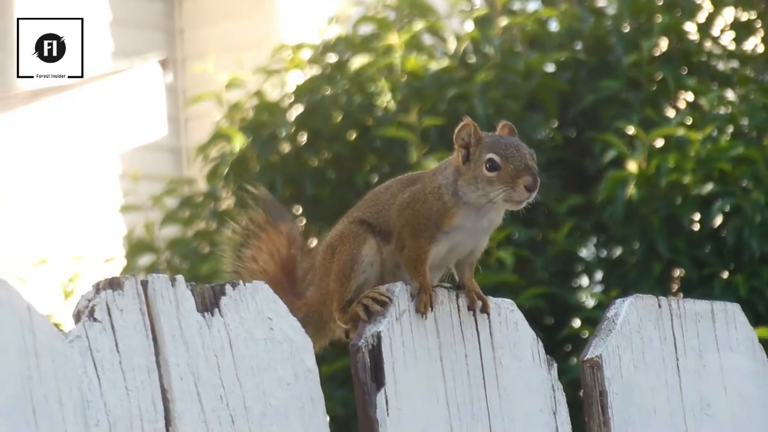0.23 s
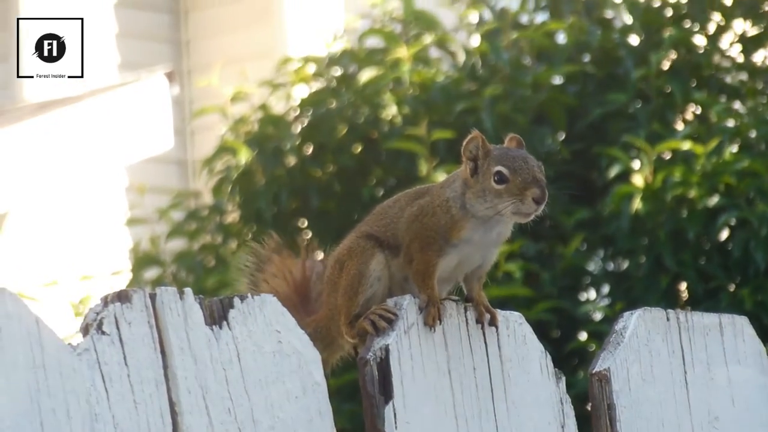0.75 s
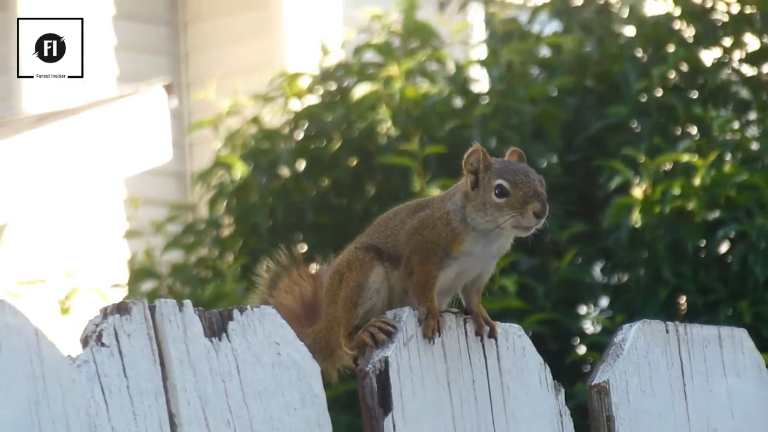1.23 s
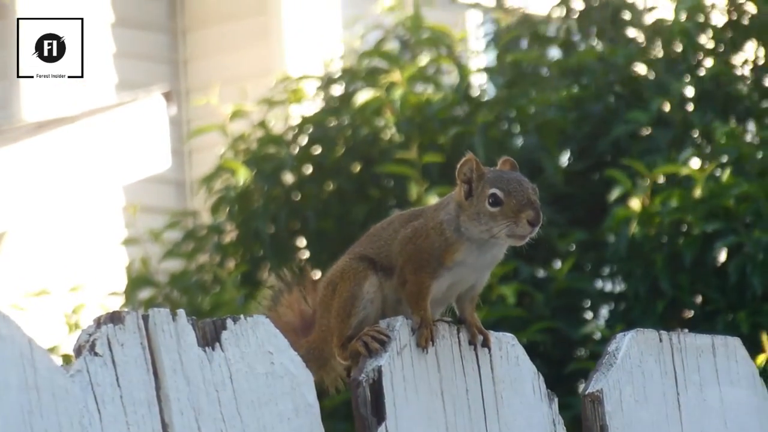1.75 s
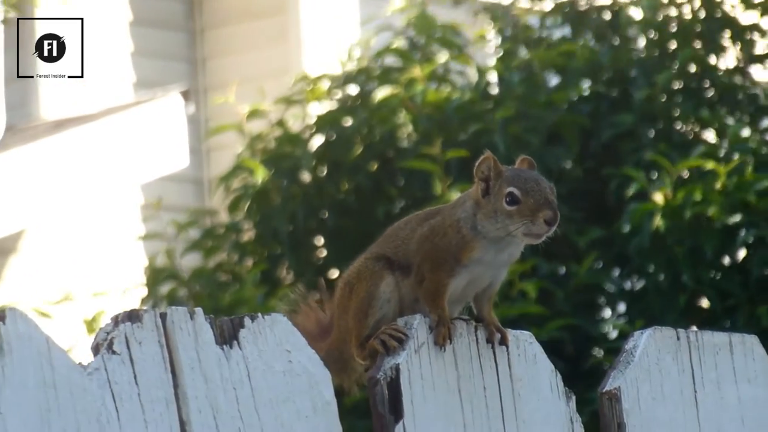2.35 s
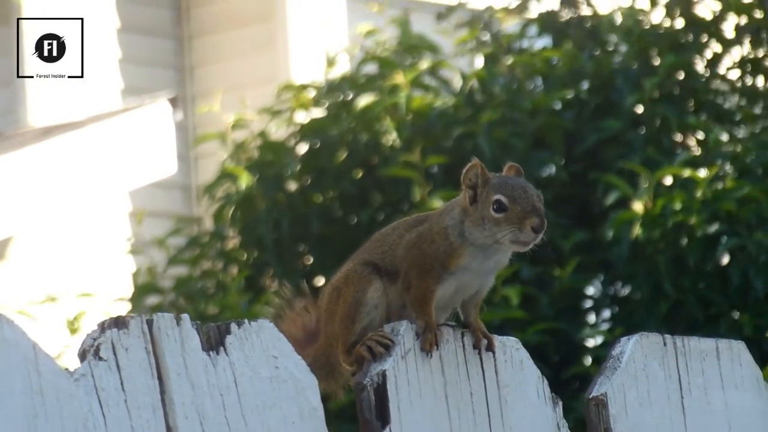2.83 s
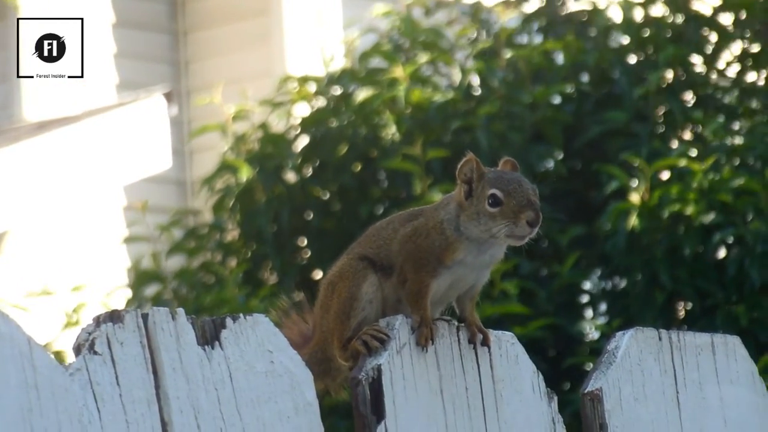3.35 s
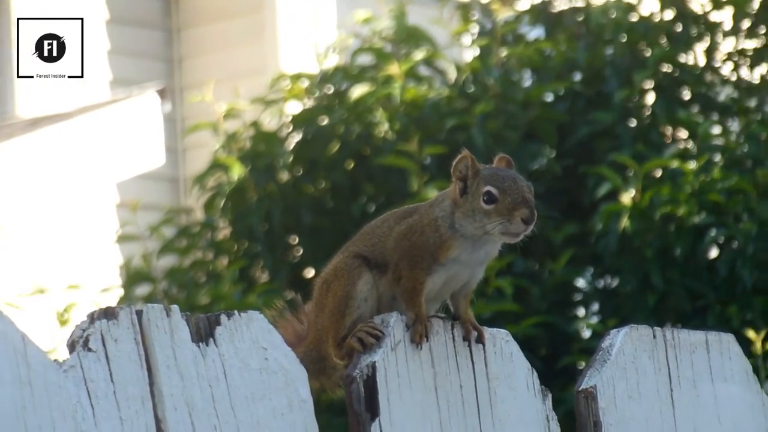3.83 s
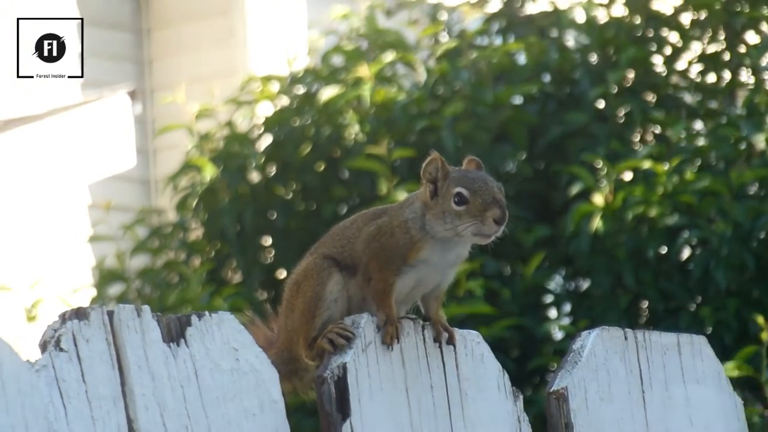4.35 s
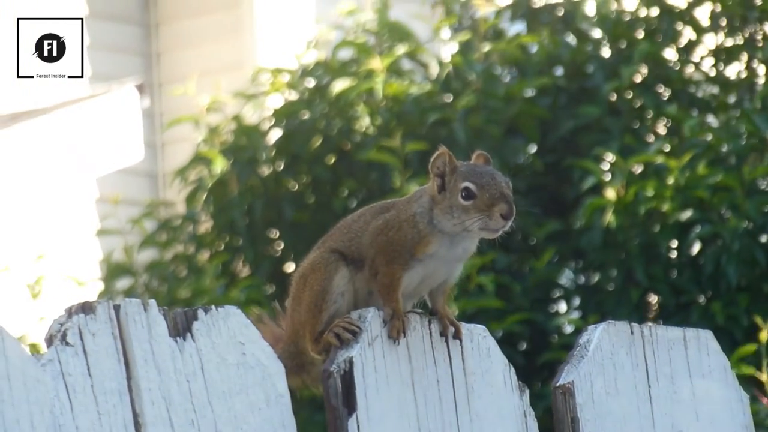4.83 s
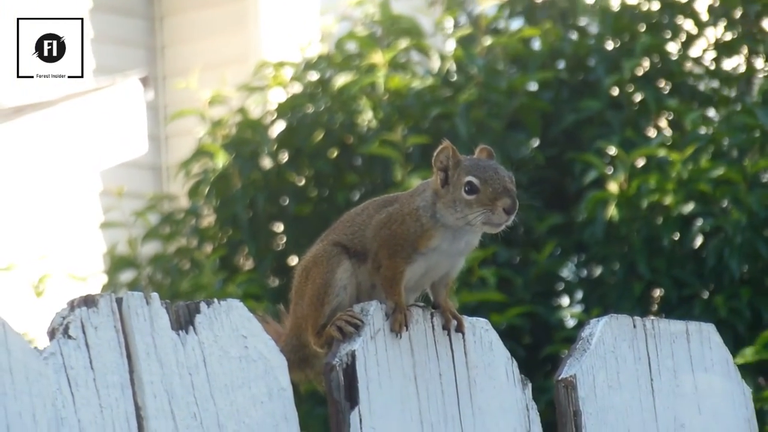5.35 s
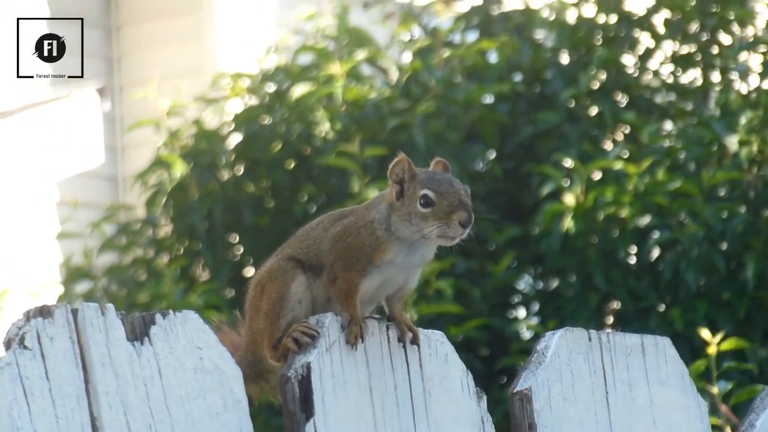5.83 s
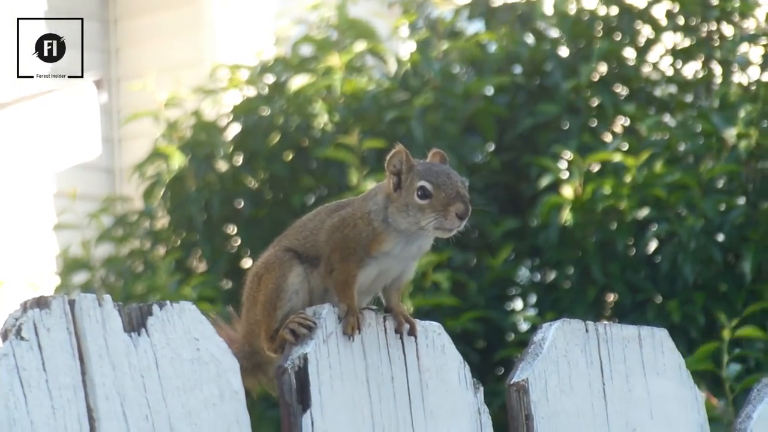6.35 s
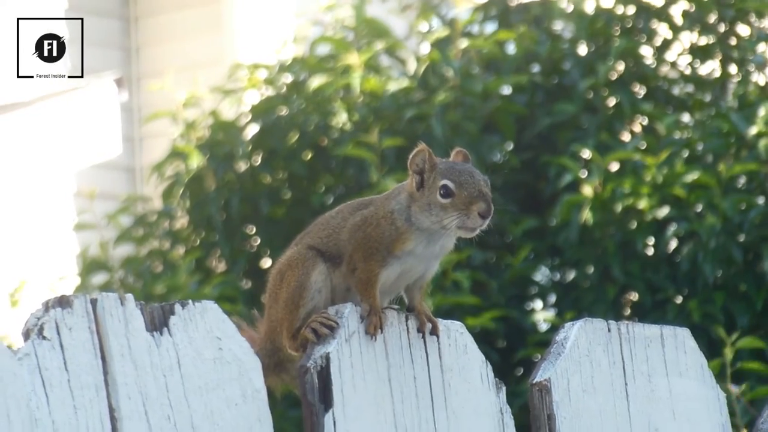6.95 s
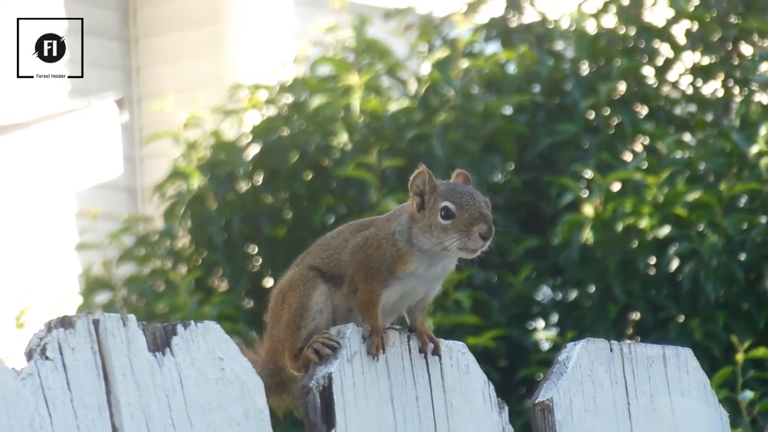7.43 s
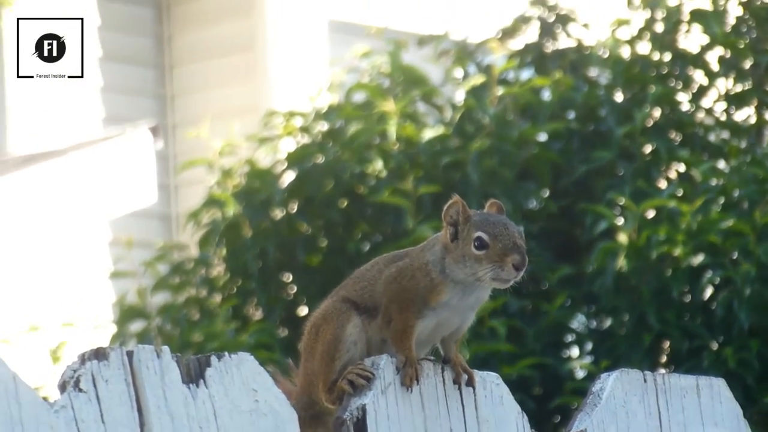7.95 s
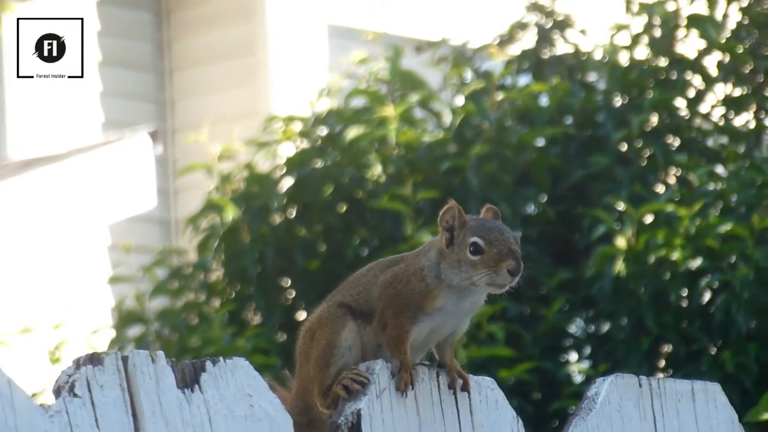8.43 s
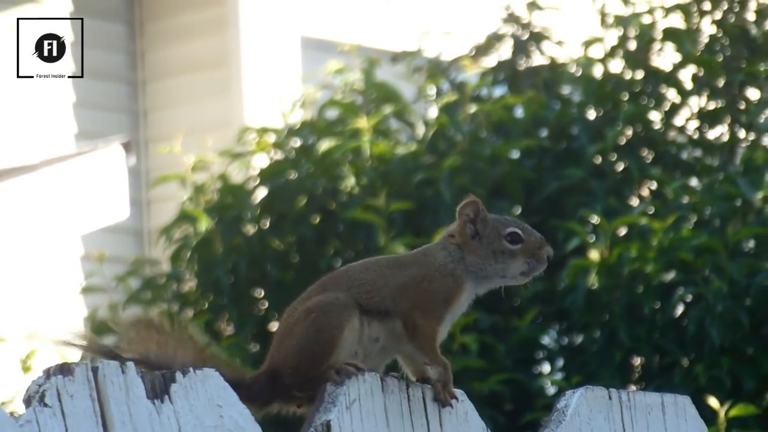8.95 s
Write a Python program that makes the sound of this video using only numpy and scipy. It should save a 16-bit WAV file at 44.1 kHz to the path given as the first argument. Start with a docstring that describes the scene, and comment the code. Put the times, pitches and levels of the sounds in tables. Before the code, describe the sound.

A squirrel scolds close by throughout, in a quiet yard with a slight echo and a faint wash of leaves and distant town. It gives thin, very high whistled squeaks about three times a second, some cracking upward, many followed at once by a short rasping chuck. In the first half second, wind bumps the microphone and a few sharp clicks sound. Near 2 seconds come a soft bump, a brief papery flutter and faint ticks. From about 2.5 to 3.2 seconds a bird behind the squirrel gives one nasal, slightly hoarse mew that falls as it fades. Quick runs of three chucks come just after 5 seconds and around 7.5 seconds. From 5.5 seconds the squirrel's voice grows drier and hoarser. Low gusts thump the microphone between 6 and 8.5 seconds, and a last squeak and chuck land at 9 seconds.

```python
"""A red squirrel scolds from a garden fence: thin, arching, whistled squeaks, some cracking to a higher
pitch, most followed at once by a short rasping chuck, a burst of air through its throat. Past halfway
its voice turns drier and hoarser. A bird gives one falling mew behind it, and the yard echoes both.
Gusts of wind bump the microphone's two openings (its ports). A few sharp clicks, faint ticks and a
papery flutter sound over the quiet wash of a distant town and leaves."""
import sys
import numpy as np
from scipy import signal
from scipy.fft import rfft, irfft, next_fast_len
from scipy.io import wavfile
from scipy.ndimage import map_coordinates

SR = 44100
rng = np.random.default_rng(int(sys.argv[2]) if len(sys.argv) > 2 else 0)


def transcribe(signal):
    """Save signal, clipped to [-1, 1], as a 16-bit WAV file at the path in sys.argv[1]."""
    frames = np.atleast_2d(signal).T
    limited = np.clip(frames, -1, 1)
    pcm = np.round(limited * 32767).astype(np.int16)
    wavfile.write(sys.argv[1], SR, pcm)


N = 405279


def amp(db):
    """Turn decibels into a gain."""
    return 10 ** (np.asarray(db) / 20)


def unit(x):
    """Scale a sound to an average (rms) level of 1."""
    return x / np.sqrt(np.mean(x ** 2) + 1e-20)


def sides(balance_db):
    """Left and right gains, with the left louder by balance_db."""
    return amp(np.array([[balance_db], [-balance_db]]) / 2)


def along(points, hz):
    """Read between (Hz, value) rows on a logarithmic frequency scale."""
    freqs, values = np.transpose(points)
    return np.interp(np.log(hz + 1), np.log(freqs + 1), values)


def curve(rows):
    """Join (seconds, value) rows into one value per sample."""
    return np.interp(np.arange(N) / SR, *np.transpose(rows))


def wobble(rate, size=N):
    """A smooth curve through `rate` random values a second."""
    return map_coordinates(rng.standard_normal(int(size * rate / SR) + 4), [np.arange(size) * rate / SR])


def filtered(x, response):
    """Multiply each frequency in x by response(hz)."""
    size = next_fast_len(N + SR // 2)
    return irfft(rfft(x, size) * response(np.fft.rfftfreq(size, 1 / SR)), size)[..., :N]


def noise(colour):
    """Noise at level 1, shaped by (Hz, dB) rows and falling away above the last."""
    response = lambda hz: amp(along(colour, hz)) / np.maximum(1, hz / colour[-1][0]) ** 4
    return unit(filtered(rng.standard_normal(N), response))


def add(track, start, sound):
    """Mix a short sound into a track at `start` seconds."""
    part = track[max(0, round(start * SR)):][:len(sound)]
    part += sound[:len(part)]


# The tone of the outdoor wash. Each row: frequency in Hz, strength in dB.
AIR_COLOUR = [(15, -44.5), (25, -6), (75, -2.5), (135, -8), (286, -3), (501, -3.5), (856, -2), (2630, -13),
              (2930, -11.5), (4040, -16.5), (5720, -20), (8100, -24.5), (12400, -27), (13500, -22),
              (15000, -62.5)]
# Its loudness. Each row: time in seconds, level in dB.
AIR_LEVEL = [(0, -49.5), (1.9, -54), (2.8, -53), (3.3, -56), (4.5, -56.5), (9.19, -55)]
# How alike its two sides are. Each row: frequency in Hz, likeness (1 = the same).
AIR_ALIKE = [(50, 0.77), (250, 0.87), (1000, 0.85), (3000, .3), (9000, 0.092)]

def air(drift_db=0.65):
    """A distant town and leaves blend into a quiet, slowly drifting wash."""
    def spread(hz):
        angle = np.arccos(along(AIR_ALIKE, hz)) / 2
        return np.array([np.cos(angle), np.sin(angle)])
    mid, side = filtered(np.array([noise(AIR_COLOUR), noise(AIR_COLOUR)]), spread)
    return unit(np.array([mid + side, mid - side])) * amp(curve(AIR_LEVEL) + drift_db * wobble(6.2))


# Swells of a far-off rush. Each row: peak time in seconds, width in seconds, level in dB.
SWELLS = [(1.35, 0.36, -57), (2.4, 0.47, -54), (8.6, 0.34, -58.5)]
# Their tone. Each row: frequency in Hz, strength in dB.
SWELL_COLOUR = [(300, -24), (650, 0.5), (800, -3.5), (1150, -2), (1400, -3), (2000, -18)]

def distant_rush():
    """A mid-pitched rush slowly comes and goes."""
    t = np.arange(N) / SR
    loudness = sum(amp(db) * np.exp(-((t - peak) / width) ** 2) for peak, width, db in SWELLS)
    return loudness * noise(SWELL_COLOUR)


# The tone of the far echo. Each row: frequency in Hz, strength in dB.
YARD_COLOUR = [(500, -11), (2000, -1.5), (2950, -3), (4000, -4.5), (5800, -7), (8500, -4), (11500, -3.5),
               (14000, 1.5)]
# How long it rings. Each row: frequency in Hz, seconds to fade by 60 dB.
YARD_DECAY = [(500, 0.266), (3000, 0.34), (6000, 0.28), (12000, 0.18)]

def yard_echo(x, near_db, far_db, near_fade_s=.1):
    """Fence and house wall answer at once; the rest of the yard rings on faintly."""
    hz, t, spectrum = signal.stft(rng.standard_normal((2, SR // 2)), SR, nperseg=256)
    colour = amp(along(YARD_COLOUR, hz))[:, None]
    decay = amp(-60 * t / along(YARD_DECAY, hz)[:, None])
    far = signal.istft(spectrum * colour * decay, SR, nperseg=256)[1]
    t = np.arange(far.shape[1]) / SR
    near = rng.standard_normal(far.shape) * amp(-60 * t / near_fade_s) * (t > .003)
    echo = amp(near_db) * near / np.linalg.norm(near[0]) + amp(far_db) * far / np.linalg.norm(far[0])
    left, right = signal.fftconvolve(x[None], echo, axes=1)[:, :N]
    mid = (left + right) / 2
    # the ports are close together, so low sounds reach both alike
    side = filtered((left - right) / 2, lambda hz: np.minimum(hz / 5000, 1))
    return np.array([mid + side, mid - side])


# Which port hears more. Each row: frequency in Hz, left over right in dB.
PORT_BALANCE = [(1000, 0.5), (3000, 2.5), (5000, -0.5), (7000, 9), (8700, -2.5), (11000, 1), (13500, -5.5)]
# Which port hears first. Each row: frequency in Hz, the left port's lead in radians.
PORT_PHASE = [(3200, 0.5), (5000, -2), (6500, -1.5), (8000, -2), (10500, -2.5), (13000, -4.5)]

def port_shading(x):
    """The camera body shades and delays the treble differently at each port."""
    left = lambda hz: amp(along(PORT_BALANCE, hz) / 2) * np.exp(1j * along(PORT_PHASE, hz) / 2)
    return filtered(x, lambda hz: np.array([left(hz), 1 / left(hz)]))


# Gusts. Each row: peak time in seconds, width in seconds, base level in dB, left over right in dB.
GUSTS = [(0.1, 0.1, -41.5, 3), (0.28, 0.09, -38.5, 0), (0.44, 0.034, -41, 7), (0.7, 0.053, -55.5, 5),
         (4.58, 0.023, -54, 0), (4.78, 0.046, -51, 2), (5.15, 0.051, -49, 7), (6.09, 0.025, -44, 3),
         (6.21, 0.067, -41.5, 10), (6.56, 0.046, -49.5, 8), (6.76, 0.063, -35.5, -4),
         (6.95, 0.084, -38.5, 15.5), (7.168, 0.035, -43, 21), (7.32, 0.095, -42.5, 13.5),
         (7.52, 0.086, -33.5, -12.5), (7.77, 0.089, -32.5, -4.5), (8.14, 0.033, -44.5, -9),
         (8.34, 0.14, -46, 3.5), (8.95, 0.034, -48, 2.5)]
# The tone of swirling air on a port. Each row: frequency in Hz, strength in dB.
SWIRL_COLOUR = [(15, -43), (25, -1.5), (173, 4.5), (465, -7), (525, -13.5), (574, -13), (775, -13.5),
                (900, -33.5), (1170, -61.5), (1980, -120)]

def wind_gusts(lumpiness_db=6, bass_hz=151, bass_pivot_db=-41.5):
    """Each gust swells and dies, its swirls striking each port on their own."""
    t = np.arange(N) / SR
    power = np.zeros((2, N))
    for peak, width, db, balance_db in GUSTS:
        from_peak = np.maximum((peak - t) / 0.75, t - peak) / width  # rises faster than it falls
        power += (amp(db) * sides(balance_db)) ** 2 / (1 + from_peak ** 3.14) ** 2
    strength = np.sqrt(power)
    swirls = np.array([unit(amp(lumpiness_db * wobble(95)) * noise(SWIRL_COLOUR)) for _ in range(2)])
    bass = filtered(swirls, lambda hz: 1 / (1 + (hz / bass_hz) ** 4))
    # the bass grows more slowly than the rest, so light gusts sound deeper
    bass_strength = amp(bass_pivot_db) * (strength / amp(bass_pivot_db)) ** 0.52
    return strength * (swirls - bass) + bass_strength * bass


# Wind bumps. Each row: time in seconds, peak level in dB, pitch in Hz, left over right in dB.
BUMPS = [(.168, -24, 160, 7.5), (0.268, -21.5, 268, 7.5), (.333, -29.5, 270, 13.5),
         (2.041, -37.5, 189, 13.5), (2.122, -43, 200, 9), (6.199, -30, 320, 16), (6.728, -22.5, 322, -22),
         (6.948, -27.5, 450, 20.5), (7.738, -19.5, 420, -16.5), (7.86, -29, 260, -21.5)]

def wind_bumps(scatter_radians=.8):
    """The strongest swirls land on the ports as single soft bumps."""
    ports = np.zeros((2, N))
    t = np.arange(-SR // 50, SR // 50) / SR
    for peak, db, hz, balance_db in BUMPS:
        shape = amp(db) * np.exp(-np.abs(t * hz) / .7)
        for port, gain in zip(ports, sides(balance_db)):
            wave = np.cos(2 * np.pi * hz * t + rng.normal(0, scatter_radians))
            add(port, peak + t[0], gain * shape * wave)
    return ports


def flutter(start=2, end=2.165, db=-50, beats_per_s=62):
    """A short run of soft papery beats."""
    t = np.arange(N) / SR
    beats = np.exp(-5 * ((t * beats_per_s + 0.15 * wobble(55)) % 1))
    progress = (t - start) / (end - start)
    swell = np.sqrt(np.clip(1 - (2 * progress - 1) ** 2, 0, 1))
    rustle = noise([(1000, -4), (3500, 8.5), (5500, -10), (8500, 0), (11000, -15), (14000, -14)])
    return amp(db) * swell * beats * rustle


# Sharp clicks and faint ticks. Each row: start in seconds, level in dB, length in seconds.
CLICKS = [(.145, -31, 0.0054), (.167, -25, 0.0017), (0.1878, -14.5, 0.0029), (1.249, -55.5, .012),
          (2.216, -40, 0.0034), (2.226, -43.5, .0065), (2.237, -46, 0.0046)]
# Their tone. Each row: frequency in Hz, strength in dB.
CLICK_COLOUR = [(300, -4), (1500, -13.5), (3000, -4.5), (4800, -9.5), (7300, 1.5), (9000, -11),
                (11500, 3.5), (14000, -4), (15500, -17.5)]

def clicks():
    """Sudden bright crackles, a few thousandths of a second long."""
    gate = np.zeros(N)
    for start, db, length in CLICKS:
        add(gate, start, np.full(int(length * SR), amp(db)))
    return gate * noise(CLICK_COLOUR)


# The bird's tune. Each row: time in seconds, pitch in Hz.
MEW_PITCH = [(2.56, 688.5), (2.6, 831.5), (2.65, 858.5), (2.74, 870), (2.83, 864), (2.91, 837.5),
             (2.97, 816), (3.04, 797.5), (3.18, 788)]
# The tones that make up its voice. Each row: multiple of the pitch, strength in dB.
MEW_HARMONICS = [(1, -35), (2, -7.5), (3, -6.5), (4, 3.5), (5, -33.5), (6, -15.5), (7, -20), (8, -30.5),
                 (9, -30), (10, -30)]

def bird_mew(start=2.55, rise_s=0.056, hold_s=0.35, release_s=.1, level_db=-37, hoarse_db=-15):
    """One nasal, slightly hoarse call swells, holds unsteadily and sags in pitch as it fades."""
    phase = 2 * np.pi * np.cumsum(curve(MEW_PITCH) * (1 + 0.0065 * wobble(150))) / SR
    tone = np.zeros(N)
    for k, db in MEW_HARMONICS:
        strength = amp(db + 3 * wobble(35.02))  # each tone flickers on its own
        roughness = amp(hoarse_db) * wobble(450) * np.cos(k * phase)
        tone += strength * (np.sin(k * phase) + roughness)
    t = np.arange(N) / SR - start
    swell = np.clip(t / rise_s, 0, 1) ** 2
    fade_db = 71 * np.maximum(t - rise_s - hold_s, 0)
    release = np.clip((MEW_PITCH[-1][0] - start - t) / release_s, 0, 1)
    return unit(tone) * swell * release * amp(level_db - fade_db + 2 * wobble(70))


def tiring(time, fresh, hoarse):
    """Slide a setting from fresh to hoarse as the squirrel tires, from 5.5 to 8.4 seconds."""
    return np.interp(time, (5.5, 8.4), (fresh, hoarse))


def puff(colour, scale, size, ripple_db=2):
    """A puff of noise, its frequencies times `scale`; its tone ripples anew with each mouth shape."""
    freqs, db = np.transpose(colour)
    hz = np.fft.rfftfreq(size, 1 / SR)
    shape_db = np.interp(hz, freqs * scale, db, left=-70, right=-70) + ripple_db * wobble(1162, len(hz))
    return unit(irfft(rfft(rng.standard_normal(size)) * amp(shape_db), size))


# The squirrel's chucks. Each row: start in seconds, base level in dB, mouth hiss boost in dB.
CHUCKS = [(.217, -32, 12), (.476, -35, 10.5), (.911, -36.5, 10.5), (1.521, -37.5, 12), (1.822, -38.5, 11.5),
          (2.286, -38.5, 12.5), (2.948, -37.5, 9.5), (3.265, -38, 10.5), (3.684, -39.5, 11),
          (4.017, -41, 11), (4.578, -41, 12), (5.124, -39, 9.5), (5.247, -40.5, 3.5), (5.371, -41.5, -5),
          (6.031, -40.5, 11), (6.867, -37, 6), (7.019, -40, -3.5), (7.352, -41.5, 10), (7.481, -39, 4.5),
          (7.621, -40.5, -3), (8.165, -39.5, 6.5), (8.992, -37.5, 9)]
# The tone of its chest and of its open mouth. Each row: base frequency in Hz, strength in dB.
CHEST_COLOUR = [(450, -28), (620, -20.5), (760, -11), (920, -19.5), (1130, -4.5), (1270, -7.5), (1400, -1),
                (1700, -16), (2300, -20.5)]
MOUTH_COLOUR = [(3500, -11), (6000, -11.5), (7400, 1), (8450, -13), (9700, -1), (11800, 3.5), (13300, -6),
                (14500, -12.5)]
# The tone of its throat and of the narrow ring within. Each row: multiple of throat_hz, strength in dB.
THROAT_COLOUR = [(.55, -31), (.7, -19), (.78, -8.5), (.9, 0.5), (1.02, 1.5), (1.13, 0.5), (1.2, -2.5),
                 (1.32, -11.5), (1.45, -7), (1.65, -9), (2.1, -11.5), (2.42, -6.5), (2.75, -30)]
RING_COLOUR = [(.85, -26.5), (.95, -8.5), (1, -3.5), (1.05, -2), (1.15, -33)]

def squirrel_chucks(closed_s=.0035, rise_s=0.011, throat_hz=2899, rattle_hz=330, rattle_db=3):
    """Briefly held air bursts out, chopped by the vocal folds, and rings chest, throat and mouth."""
    out = np.zeros(N)
    size = int(.08 * SR)
    t = np.arange(size) / SR
    swell = np.clip(t / rise_s, 0, 1)
    since_peak = np.maximum(t - rise_s, 0)
    fast_fade = np.exp(-(since_peak / 0.0095) ** 1.43)
    slow_fade = np.exp(-(since_peak / 0.02) ** 1.43)
    average_db = np.mean(CHUCKS, axis=0)[1]
    for start, db, hiss_db in CHUCKS:
        lone = not any(0 < start - squeak[0] < .1 for squeak in SQUEAKS)
        # harder chucks ring more; lone ones, with no squeak just before, ring less
        ring_db = tiring(start, 5.5, -8.5) + 0.36 * (db - average_db) - 12.5 * lone
        burst = amp(db) * unit(amp(rattle_db * wobble(rattle_hz, size)))
        chest = swell * fast_fade * amp(-1.5) * puff(CHEST_COLOUR, 0.99, size)
        throat = swell * slow_fade * amp(2.5) * puff(THROAT_COLOUR, throat_hz, size)
        hiss = swell ** 0.52 * fast_fade * amp(hiss_db + 0.56) * puff(MOUTH_COLOUR, 0.98, size)
        # the narrow ring builds slowly and rides through the chopping
        ring = swell ** 2 * slow_fade * puff(RING_COLOUR, throat_hz, size, ripple_db=0)
        add(out, start + closed_s, burst * (chest + throat + hiss) + amp(db + ring_db) * ring)
    return out


# The squirrel's squeaks. Each row: start in seconds, length in seconds, base pitch in Hz,
# base level in dB, share sung before the voice cracks (1 = it holds).
SQUEAKS = [(.164, 0.056, 5780, -29, 1), (0.446, 0.029, 5640, -33, 1), (.68, .034, 5680, -37, 1),
           (.869, 0.038, 5760, -34, 1), (1.481, 0.037, 5900, -26.5, .37), (1.781, 0.041, 5900, -30, .4),
           (2.244, .049, 5700, -36, 1), (2.596, .044, 5805, -30, .3), (2.906, 0.043, 5940, -26.5, .4),
           (3.223, 0.041, 5845, -35.5, 1), (3.646, 0.041, 5930, -28, .3), (3.971, 0.05, 5890, -36.5, 1),
           (4.33, 0.036, 5905, -40, 1), (4.539, .035, 5870, -38, 1), (4.882, 0.042, 5826, -39, 1),
           (5.084, 0.036, 5790, -37.5, 1), (5.704, .056, 5890, -33, .28), (5.98, .061, 5810, -36, .42),
           (6.206, 0.037, 5500, -46.5, 1), (6.376, 0.067, 5800, -36.5, .36), (6.595, 0.055, 5700, -47.5, 1),
           (6.738, 0.059, 5717, -42.5, 1), (7.305, 0.056, 5895, -35.5, .3), (7.894, 0.037, 5950, -36, .38),
           (8.118, 0.062, 5800, -37.5, .4), (8.499, 0.056, 5850, -39, .05), (8.755, 0.043, 5940, -35, .35),
           (8.957, 0.036, 5910, -33, .3)]
# The tone of the breath in them. Each row: frequency in Hz, strength in dB.
BREATH_COLOUR = [(1500, -28.5), (3100, -5.5), (4300, -12.5), (6300, 3.5), (8300, -10.5), (10200, -2),
                 (11700, -0.5), (13500, -14)]

def squirrel_squeaks(crack_leap=1.135, ring_hz=3030, tone_db=2.5, breath_db=-23):
    """A whistle arches and frays, ringing the throat about an octave below; a crack leaps and rasps."""
    voice, breath = np.zeros(N), np.zeros(N)
    for start, length, hz, db, crack_at in SQUEAKS:
        t = np.arange(int(length * SR)) / SR
        progress = t / length
        cracks = crack_at < .8
        cracked = cracks * np.clip((t - crack_at * length) / 0.00074, 0, 1)  # 0 before, 1 after
        fray = np.clip((progress - .4) / .3, 0, 1)
        rasp = cracked * amp(tiring(start, -16.5, -10.5))
        scoop = 0.222 * np.exp(-t / 0.00302)  # starts low and shoots up
        sag = .24 * progress ** (6 - 1.5 * cracked)  # the strained high voice sags sooner
        jitter = (.005 + .016 * fray + .07 * rasp) * wobble(1100, len(t))
        pitch = hz * (1.014 - scoop - sag) * (1 + (crack_leap - 1) * cracked) * (1 + jitter)
        phase = 2 * np.pi * np.cumsum(pitch) / SR
        shape = np.clip(t / .005, 0, 1) * np.clip((1 - progress) / 0.32, 0, 1)
        flicker_db = 3 * (fray - 0.5) * wobble(400, len(t))
        push = shape * amp(db + flicker_db - 4 * (cracks - cracked))  # softer before a crack
        whistle = np.sin(phase) + amp(-6.5 - 6.1 * cracks - 11 * cracked) * np.sin(2 * phase)
        ring_db = tiring(start, -9.5, -15.5) - 5.5 * cracks
        ring = fray * amp(ring_db) * np.sin(2 * np.pi * ring_hz * t + 1.5 * wobble(300, len(t)))
        overtone = amp(-28.5 + 9.1 * cracked) * np.sin(1.5 * phase)
        add(voice, start, amp(tone_db) * push * (whistle + ring + overtone))
        add(breath, start, push * (amp(breath_db) * (0.97 + fray) + rasp))
    return voice + breath * noise(BREATH_COLOUR)


def scene():
    """The squirrel close by, the bird behind it, wind and air around."""
    squeaks, chucks, mew = squirrel_squeaks(), squirrel_chucks(), bird_mew()
    voices = port_shading(squeaks + chucks + mew)
    echoes = yard_echo(squeaks, near_db=-1.5, far_db=-3, near_fade_s=0.11)
    echoes += yard_echo(chucks, near_db=0.5, far_db=-5.5)
    echoes += yard_echo(mew, near_db=-10, far_db=-8)
    small_noises = (clicks() + flutter()) * sides(2)
    return voices + echoes + small_noises + wind_gusts() + wind_bumps() + air() + distant_rush()


def record(dry, top_hz=14250):
    """The camera cuts off the very highest treble."""
    return filtered(dry, lambda hz: 1 / np.sqrt(1 + (hz / top_hz) ** 120))


dry = scene()
out = record(dry)
transcribe(out)
```